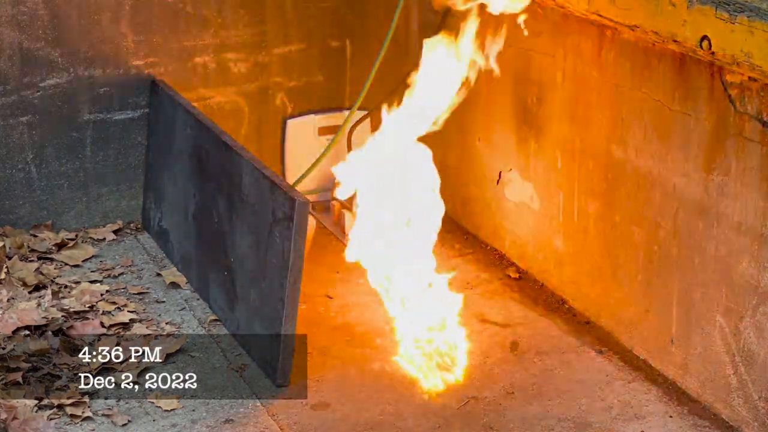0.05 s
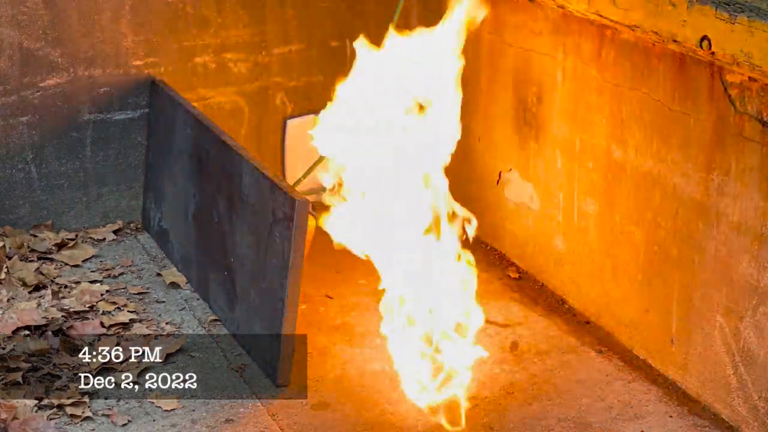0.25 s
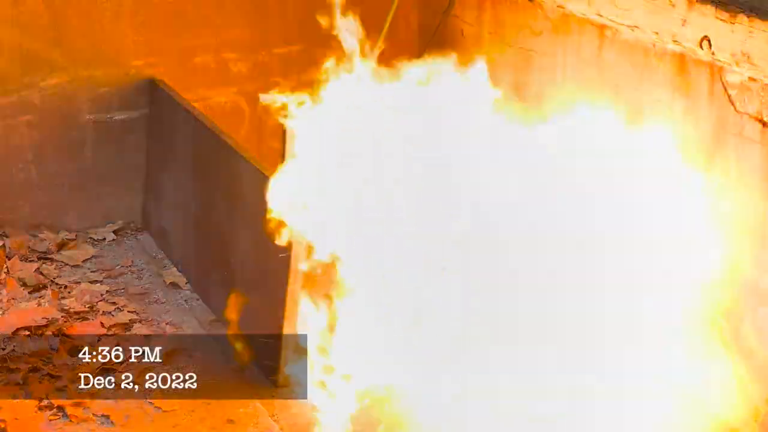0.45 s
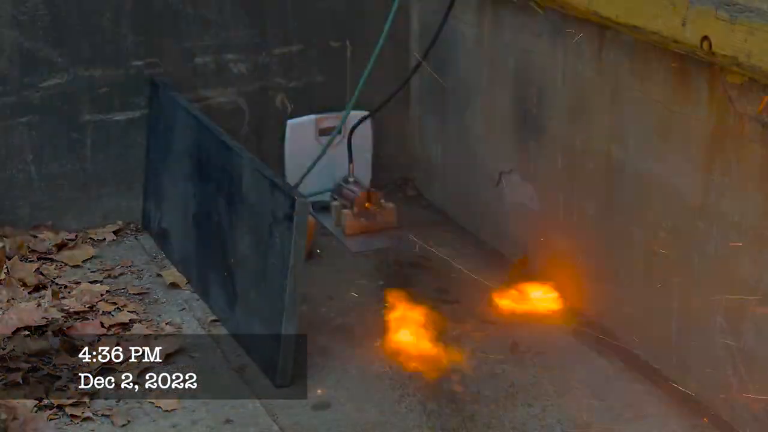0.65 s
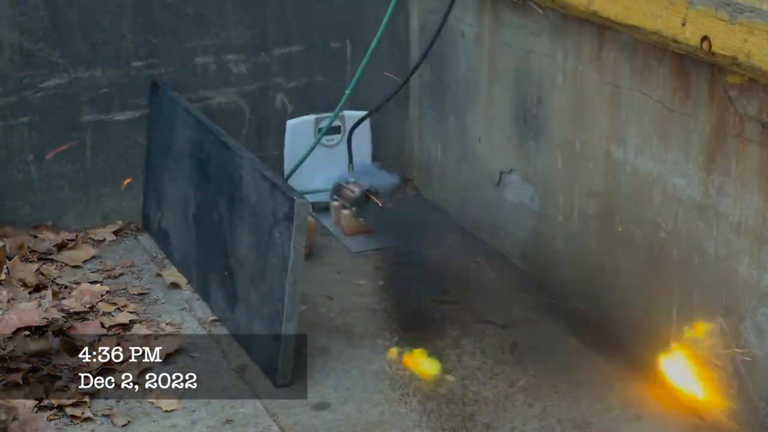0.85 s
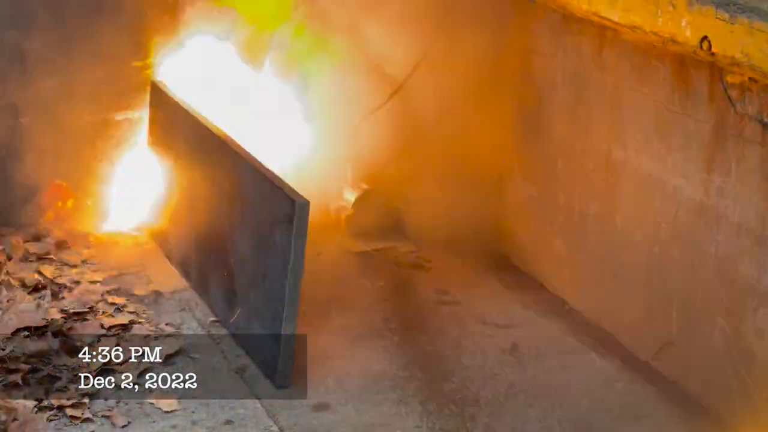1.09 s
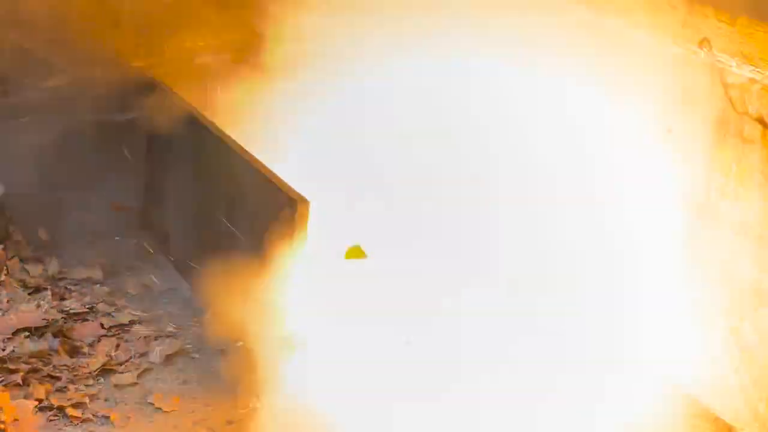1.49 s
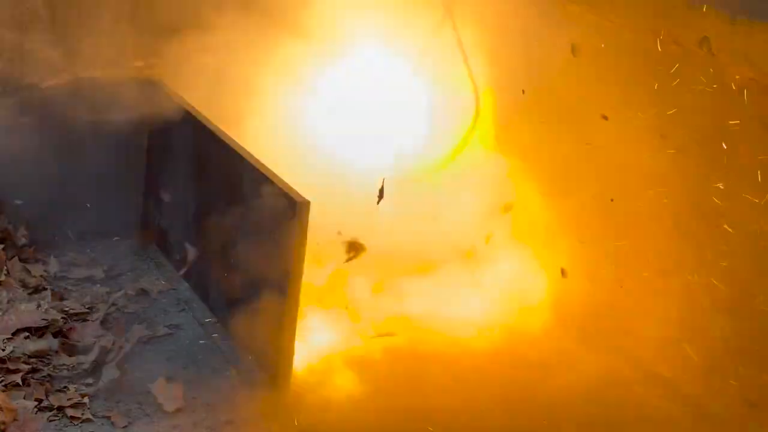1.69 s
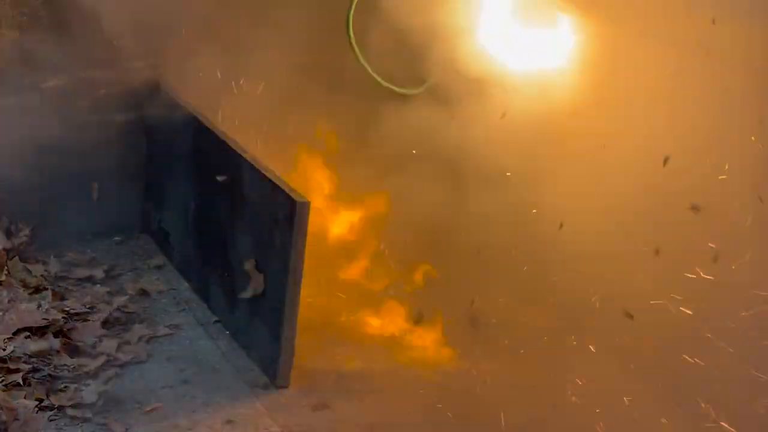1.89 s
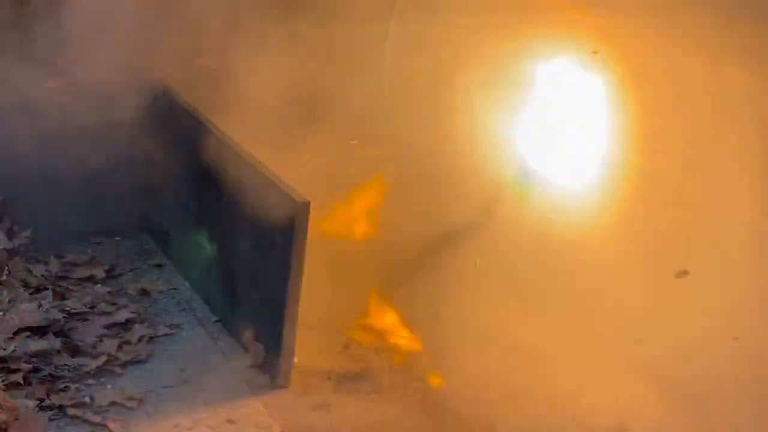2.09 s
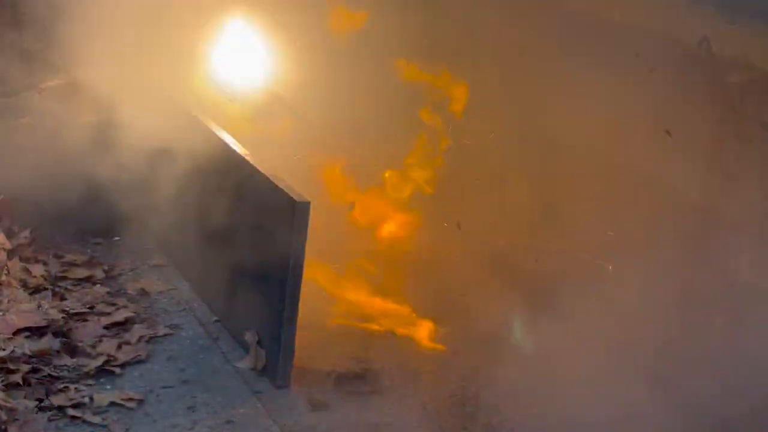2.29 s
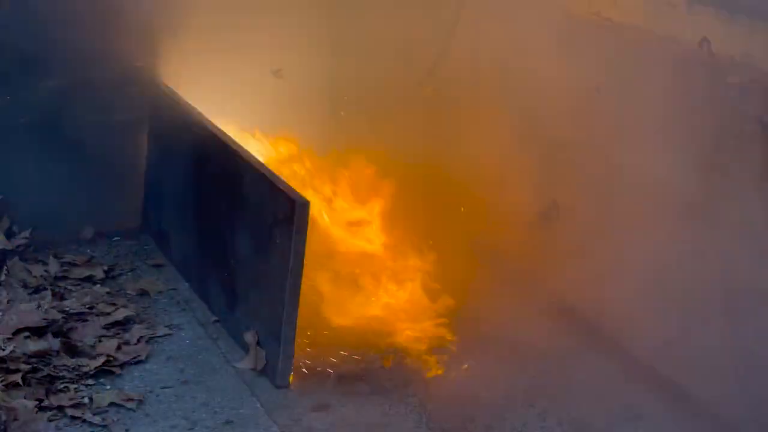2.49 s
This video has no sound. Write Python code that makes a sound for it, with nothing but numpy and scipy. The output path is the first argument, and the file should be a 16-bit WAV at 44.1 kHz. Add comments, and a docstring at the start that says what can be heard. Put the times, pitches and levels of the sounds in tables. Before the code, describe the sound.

A small rocket engine blows up after a hissing spray catches fire with soft, low thumps. Sharp bangs lead into a short roar, another blast, and uneven sputtering over a high hiss, with a tight echo off concrete.

```python
"""A pilot torch hisses from the start over the low flutter of a flame: a small rocket engine
is about to fail in a concrete test bay. The valve spurts, and the spray lights as a soft fireball and
hisses on. The engine bursts alight with a cluster of blasts, roars and crackles for half a second, and
sputters on in gusts and pops. Rushing gas is shaped noise, crackle is a shower of tiny shocks, and thumps
are fading low tones. A short echo widens the sound, and the high hiss spreads between left and right."""
import sys
import numpy as np
from scipy import signal
from scipy.fft import rfft, irfft
from scipy.io import wavfile
from scipy.ndimage import uniform_filter1d

SR = 44100
rng = np.random.default_rng(int(sys.argv[2]) if len(sys.argv) > 2 else 0)


def file_out(sig):
    """Save sig as 16-bit WAV at sys.argv[1]."""
    # one column per channel
    cols = np.atleast_2d(sig).T
    # limit, then scale
    lim = np.clip(cols, -1, 1)
    pcm = np.round(lim * 32767).astype(np.int16)
    wavfile.write(sys.argv[1], SR, pcm)


N = 116865
T = np.arange(N) / SR
HZ = np.fft.rfftfreq(N, 1 / SR)


def amp(db):
    """Turns decibels into a number to multiply by."""
    return 10 ** (np.asarray(db) / 20)


def evened(x):
    """Scales a signal to an average power of 1."""
    return x / np.sqrt(np.mean(x ** 2) + 1e-20)


def noise():
    """A fresh, plain hiss."""
    return rng.standard_normal(N)


def across_pitch(points):
    """Joins rows of (frequency in Hz, value) into a curve, giving each octave equal room."""
    hz, value = np.transpose(points)
    return np.interp(np.log(HZ + 1), np.log(hz), value)


def level(points):
    """Joins rows of (time in seconds, level in dB) into a volume curve."""
    return amp(np.interp(T, *np.transpose(points)))


def coloured(x, tone):
    """Gives x the balance of lows and highs in a tone table, at an average power of 1."""
    return evened(irfft(rfft(x) * amp(across_pitch(tone)), N))


def burst(start, rise_s, fade_s):
    """A quick rise, then a fall of 60 dB every fade_s seconds."""
    age = np.maximum(T - start, 0)
    return np.minimum(age / rise_s, 1) * amp(-60 * np.maximum(age - rise_s, 0) / fade_s)


def flutter(rate_hz, depth_db):
    """A volume that wavers at random, up to about the given rate."""
    wobble = irfft(rfft(noise()) * HZ / (HZ + 10) / (1 + (HZ / rate_hz) ** 2), N)
    return amp(depth_db * evened(wobble))


def turbulence(tone, rate_hz, depth_db):
    """Rushing gas that comes in uneven gusts."""
    return evened(coloured(noise(), tone) * flutter(rate_hz, depth_db))


def crackle(tone, shocks_per_s, rate_hz, depth_db, spread_db=1.5, shock_share=0.4):
    """Rushing gas mixed with clumps of small shocks of unequal size."""
    hits = rng.random(N) < shocks_per_s / SR
    sizes = amp(spread_db * np.minimum(rng.exponential(1, N), 4))
    shocks = evened(hits * sizes * rng.choice([-1, 1], N))
    gas = np.sqrt(shock_share) * shocks + np.sqrt(1 - shock_share) * noise()
    return coloured(gas * flutter(rate_hz, depth_db), tone)


def fuzzy_tone(hz, width_hz):
    """Noise narrowed down to the sound near one pitch."""
    return evened(irfft(rfft(noise()) / (1 + ((HZ - hz) / width_hz) ** 2), N))


def spitting(x, depth_db, size=512):
    """Narrow bands of the sound flare and fade, each on its own."""
    bands = signal.stft(x, nperseg=size)[2]
    patches = uniform_filter1d(rng.standard_normal(bands.shape), size=7, axis=0)  # smooth over pitch
    patches = uniform_filter1d(patches, size=3, axis=1)  # and over time
    return evened(signal.istft(bands * amp(depth_db * evened(patches)), nperseg=size)[1][:N])


def whoomp(tone, size=600):
    """A full-bodied rush of low noise that holds its power from one moment to the next."""
    rush = coloured(noise(), tone)
    power = uniform_filter1d(uniform_filter1d(rush ** 2, size), size)
    return rush / np.sqrt(power)


# How loud the two flames are. Each row: time in seconds, level in dB.
TORCH_VOLUME = [(.14, -26.5), (.21, -24.5), (.28, -24.5), (.38, -74)]
FLAME_VOLUME = [(0, -30.5), (.68, -33), (.86, -45), (1.04, -29), (1.6, -32), (2.0, -39), (2.38, -39),
                (2.46, -55)]
# Their lows and highs. Each row: frequency in Hz, relative strength in dB.
TORCH_TONE = [(100, -26), (420, 6), (2800, -14), (3850, -2.5), (4350, -12), (5250, 4), (7600, -13.5),
              (10500, -9.5), (12900, 1), (14300, -13)]
FLAME_TONE = [(22, -4), (75, -2), (170, -6), (360, -18.5), (16000, -51)]

def flames():
    """The pilot torch hisses briefly over the low flutter of a loose flame."""
    torch = level(TORCH_VOLUME) * turbulence(TORCH_TONE, rate_hz=230, depth_db=1.5)
    loose_flame = level(FLAME_VOLUME) * turbulence(FLAME_TONE, rate_hz=32, depth_db=3.0)
    return torch + loose_flame


# Surges in the gas. Each row: start in seconds, pitch in Hz, level in dB.
GAS_SURGES = [(.3, 10700, -11), (0.292, 4000, -15.5), (0.385, 3050, -17), (.588, 2600, -30),
              (1.084, 1050, -14), (1.824, 1410, -27), (2.107, 1720, -26), (2.39, 2400, -26)]

def surges():
    """For a moment the gas stream takes on a pitch."""
    return sum(amp(db) * burst(start, rise_s=0.0049, fade_s=0.14) * fuzzy_tone(hz, width_hz=0.13 * hz)
               for start, hz, db in GAS_SURGES)


# How loud the valve's spurt and the spray are. Each row: time in seconds, level in dB.
SPURT_VOLUME = [(.268, -55), (.296, -16.5), (.323, -17), (.336, -10.5), (.35, -15), (.41, -18), (.48, -67)]
SPRAY_VOLUME = [(.27, -70), (.32, -29), (.41, -16), (.47, -18), (.64, -21.5), (.73, -26.5), (.95, -25),
                (1.55, -29.5), (1.71, -31), (1.87, -28), (2.19, -24), (2.29, -32.5), (2.39, -23.5),
                (2.48, -40.5), (2.65, -29.5)]
# Their lows and highs. Each row: frequency in Hz, relative strength in dB.
SPURT_TONE = [(200, -6), (1400, -4), (1900, -10.5), (2700, -0.5), (5400, -1), (7900, -9.5), (10600, -3),
              (12500, -25)]
SPRAY_TONE = [(200, -6), (1000, -7), (1800, -7), (3050, 3), (4200, -1.5), (6300, 2), (12700, 2.5),
              (14200, -6)]
# Whistles in the spray. Each entry: pitch in Hz.
WHISTLE_PITCHES = [3050, 3110, 3800]

def propellant():
    """A shrill spurt from the opening valve settles into a spitting spray with faint whistles."""
    spurt = level(SPURT_VOLUME) * turbulence(SPURT_TONE, rate_hz=190, depth_db=1.5)
    whistles = amp(-25) * sum(fuzzy_tone(hz, width_hz=11) for hz in WHISTLE_PITCHES)
    spray = spitting(turbulence(SPRAY_TONE, rate_hz=72, depth_db=0.84), depth_db=2.5)
    return spurt + level(SPRAY_VOLUME) * (spray + whistles)


# How loud the fireball is. Each row: time in seconds, level in dB.
FIREBALL_VOLUME = [(.3, -68), (.338, -17.5), (.45, -12), (.475, -21), (.53, -32.5), (.62, -55)]
# Its lows and highs. Each row: frequency in Hz, relative strength in dB.
FIREBALL_TONE = [(20, 0), (90, -0.5), (270, 1), (520, -18.5), (2600, -74)]

def fireball():
    """The spray lights with a soft, deep rush."""
    return level(FIREBALL_VOLUME) * whoomp(FIREBALL_TONE)


# Low thumps. Each row: start in seconds, pitch in Hz, peak level in dB.
GAS_THUMPS = [(0.352, 91, -9.5), (0.386, 87.5, -5), (0.436, 165, -12), (0.467, 79, -7), (0.544, 63.5, -8.5),
              (0.9023, 150, -13.5), (0.919, 82, -8.5), (0.949, 93, -5), (1.633, 61.6, -22),
              (1.699, 72, -23.5), (1.768, 62, -26)]

def thumps():
    """Pockets of gas catch fire, each with a short, low tone."""
    return sum(amp(db) * burst(start, rise_s=0.0026, fade_s=0.11) * np.sin(2 * np.pi * hz * (T - start))
               for start, hz, db in GAS_THUMPS)


# How loud the sputter is. Each row: time in seconds, level in dB.
SPUTTER_VOLUME = [(1.3, -60), (1.47, -45), (1.55, -21.5), (1.6, -27), (1.745, -35), (1.84, -24.5),
                  (1.98, -26.5), (2.15, -28), (2.195, -22), (2.25, -28), (2.32, -31), (2.4, -28.5),
                  (2.45, -31.5), (2.56, -36.5), (2.615, -26.5), (2.65, -44)]
# Pops in the exhaust. Each row: start in seconds, level in dB.
EXHAUST_POPS = [(1.511, -26), (1.656, -21), (1.721, -24), (1.766, -24), (1.881, -21.5), (2.078, -26),
                (2.173, -25.5), (2.358, -25), (2.455, -28.5)]
# The lows and highs of both. Each row: frequency in Hz, relative strength in dB.
SPUTTER_TONE = [(40, -9), (120, -3), (1400, 0), (4300, -9.5), (6000, -6.5), (13000, -3.5), (14800, -12)]
POP_TONE = [(40, -16), (170, 9.5), (1400, 2.5), (15000, -13)]

def sputter():
    """The failing engine's exhaust breaks down into coarse gusts and pops."""
    gusts = spitting(crackle(SPUTTER_TONE, shocks_per_s=900, rate_hz=76, depth_db=2.5), depth_db=2.5)
    pop_volume = sum(amp(db) * burst(start, rise_s=0.0026, fade_s=0.067) for start, db in EXHAUST_POPS)
    return level(SPUTTER_VOLUME) * gusts + pop_volume * coloured(noise(), POP_TONE)


# The engine's blasts. Each row: start in seconds, crack level in dB, boom level in dB.
ENGINE_BLASTS = [(0.894, -12.5, -18), (0.907, -11, -17), (0.936, -13, -14.5), (0.957, -31, -9),
                 (0.996, -11, -14.5), (1.433, -16, -18)]
# The lows and highs of crack and boom. Each row: frequency in Hz, relative strength in dB.
CRACK_TONE = [(800, 2.5), (4000, -6), (11000, -5), (15000, -10)]
BOOM_TONE = [(20, -24), (60, -4.5), (150, -5.5), (470, -4), (2500, -73)]

def blasts(rise_s=0.008):
    """Each blast is a bright crack over a longer boom; where blasts overlap, their powers add."""
    crack_power = sum((amp(db) * burst(start, rise_s, fade_s=0.074)) ** 2
                      for start, db, _ in ENGINE_BLASTS)
    boom_power = sum((amp(db) * burst(start, rise_s, fade_s=0.16)) ** 2
                     for start, _, db in ENGINE_BLASTS)
    cracks = np.sqrt(crack_power) * coloured(noise(), CRACK_TONE)
    booms = np.sqrt(boom_power) * whoomp(BOOM_TONE)
    return cracks + booms


# How loud the burning engine is. Each row: time in seconds, level in dB.
ROAR_VOLUME = [(.885, -57), (.903, -16.5), (1.14, -16.5), (1.21, -14.5), (1.37, -15), (1.415, -19),
               (1.46, -18), (1.5, -25.5), (1.55, -27.5), (1.75, -100)]
# Its lows and highs. Each row: frequency in Hz, relative strength in dB.
ROAR_TONE = [(20, -5), (50, 1), (500, -1.5), (4000, -15.5), (12500, -17), (14500, -28)]

def roar():
    """The burning engine blows out gas thick with tiny shocks."""
    return level(ROAR_VOLUME) * crackle(ROAR_TONE, shocks_per_s=2500, rate_hz=54, depth_db=1.3)


def sources():
    """Everything that burns, blows and bursts, with fresh noise on every call."""
    return flames() + fireball() + thumps() + propellant() + surges() + blasts() + roar() + sputter()


# How wide the sound is at each pitch, nearly mono around 2-4 kHz.
# Each row: frequency in Hz, level of the sides in dB compared with the middle.
STEREO_WIDTH = [(100, -16), (300, -13), (750, -5.5), (1150, -5.5), (1800, -53.5), (4200, -39.5), (5200, -7),
                (7450, -10), (9800, -19), (10800, -7), (12000, -14)]
# A left-right phase offset that spreads the high hiss. Each row: frequency in Hz, offset in radians.
STEREO_PHASE = [(4400, 0), (5500, -1), (6450, -.2), (7300, -.9), (7700, -2.9), (8700, -2.9), (10400, 0),
                (11200, 0), (12900, 3.1), (14000, 3.3), (14800, 6.28)]

def scene(echo_fade_s=0.065):
    """A short echo, added on the left and taken away on the right, widens the sound."""
    echoes = noise() * amp(-60 * T / echo_fade_s)
    echoed = signal.fftconvolve(sources(), echoes / np.linalg.norm(echoes))[:N]
    sides = 1j * rfft(echoed)  # 1j shifts every frequency by a quarter of a cycle
    middle = rfft(sources())
    sign = np.array([[1], [-1]])  # left, right
    width = amp(across_pitch(STEREO_WIDTH))
    heard = (middle + sign * width * sides) / np.sqrt(1 + width ** 2)
    return irfft(heard * np.exp(.5j * sign * across_pitch(STEREO_PHASE)), N)


def record(dry, low_cut_hz=37, ceiling=0.97, high_cut_hz=15850):
    """The microphone sheds the deepest rumble and rounds off loud peaks; then the top hiss is cut."""
    trimmed = irfft(rfft(dry) * HZ ** 6 / (HZ ** 6 + low_cut_hz ** 6), N)
    rounded = trimmed / (1 + (trimmed / ceiling) ** 6) ** (1 / 6)
    treble_cut = signal.firwin(511, high_cut_hz, window=("kaiser", 9), fs=SR)
    return signal.oaconvolve(rounded, treble_cut[None], "same")


dry = scene()
out = record(dry)
file_out(out)
```